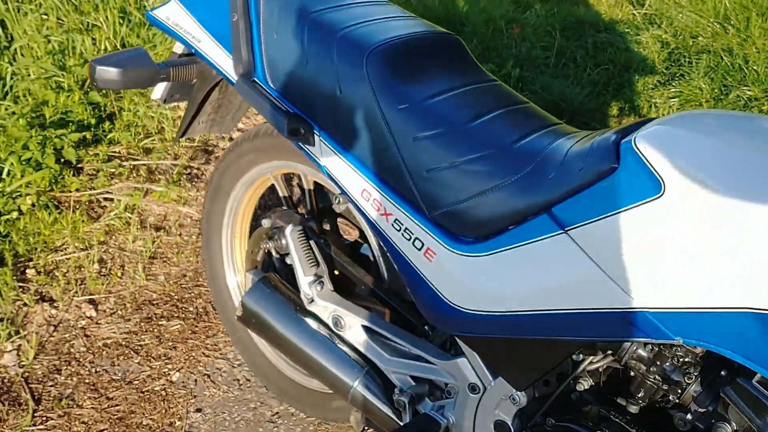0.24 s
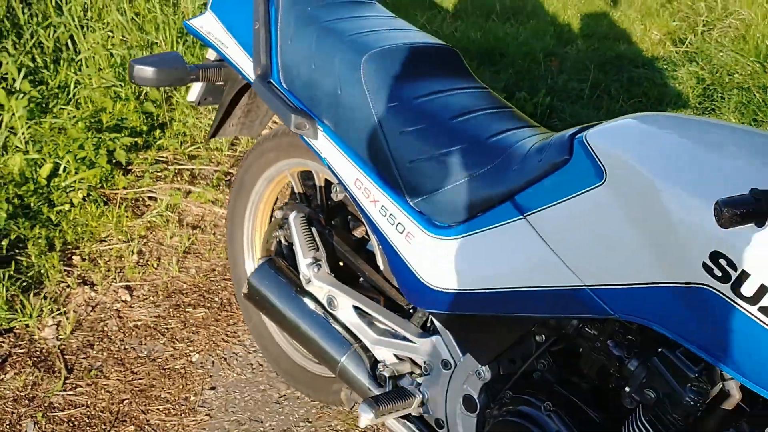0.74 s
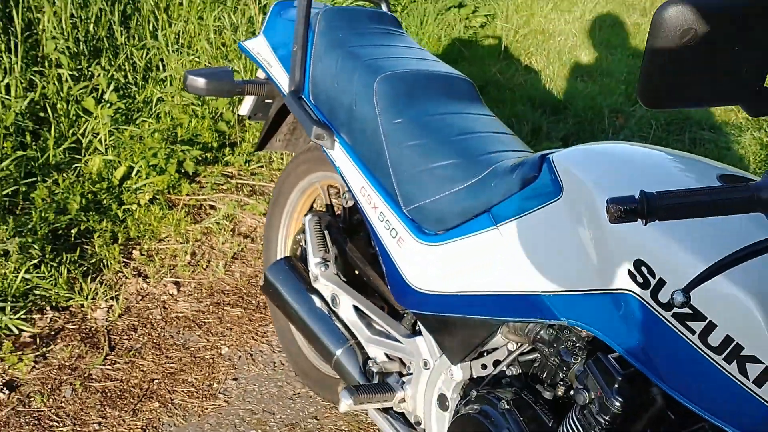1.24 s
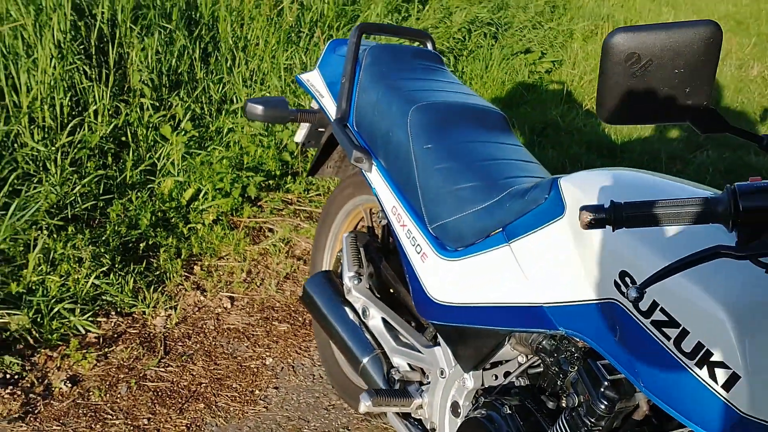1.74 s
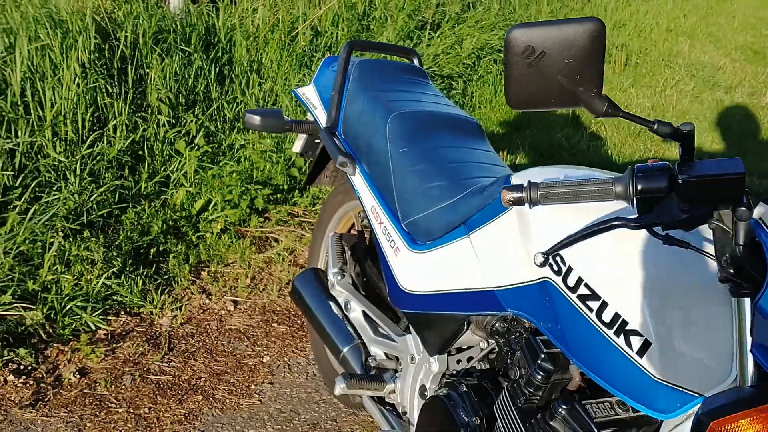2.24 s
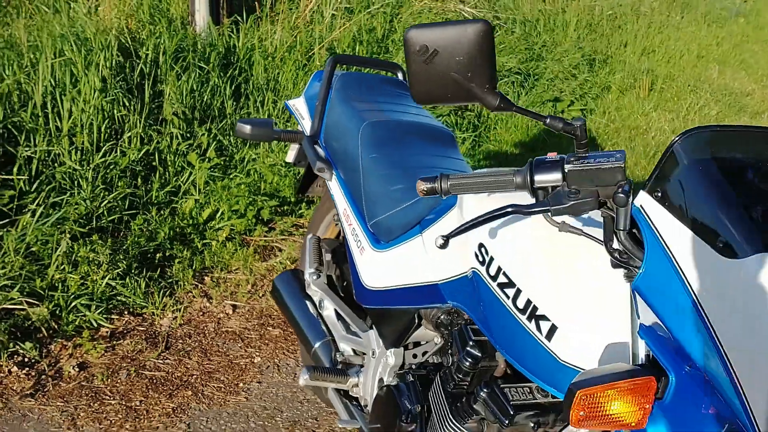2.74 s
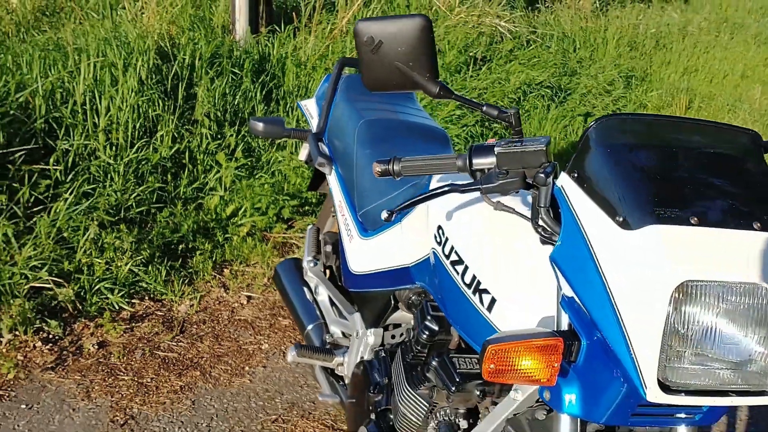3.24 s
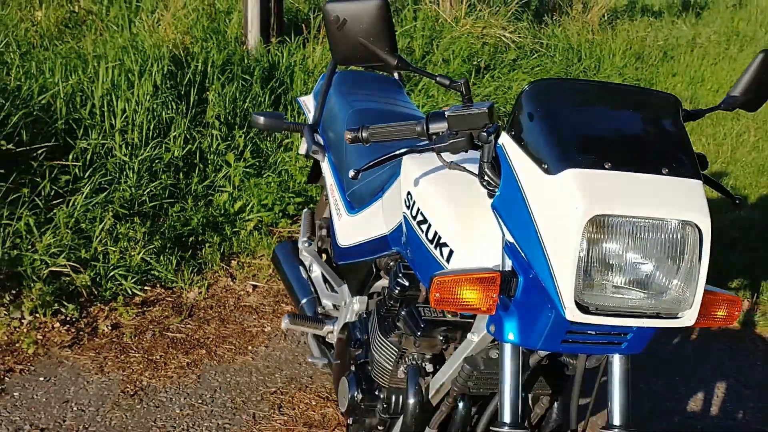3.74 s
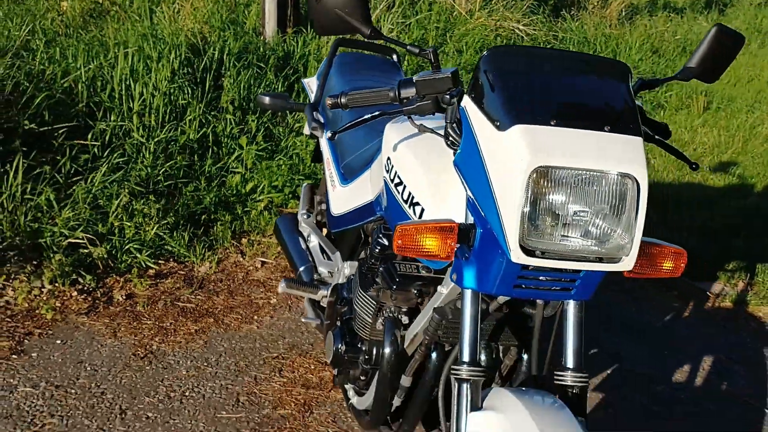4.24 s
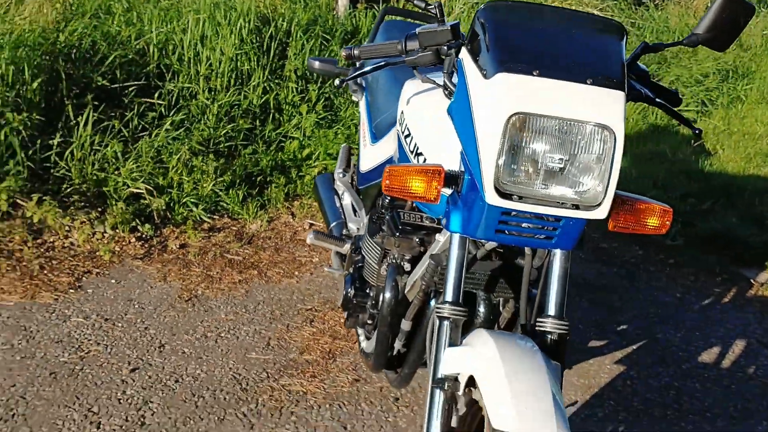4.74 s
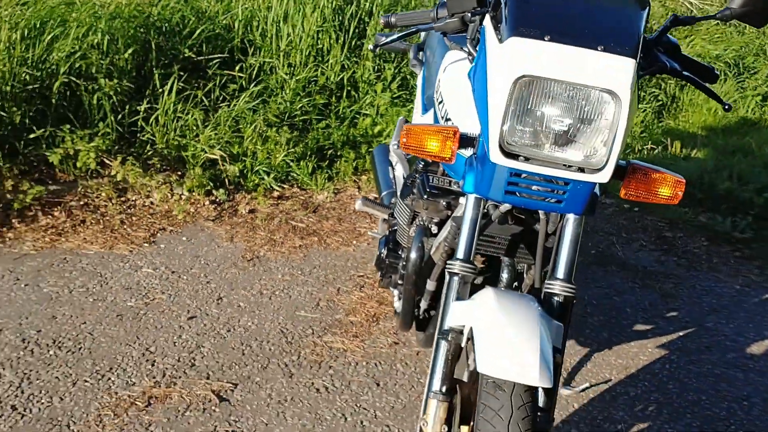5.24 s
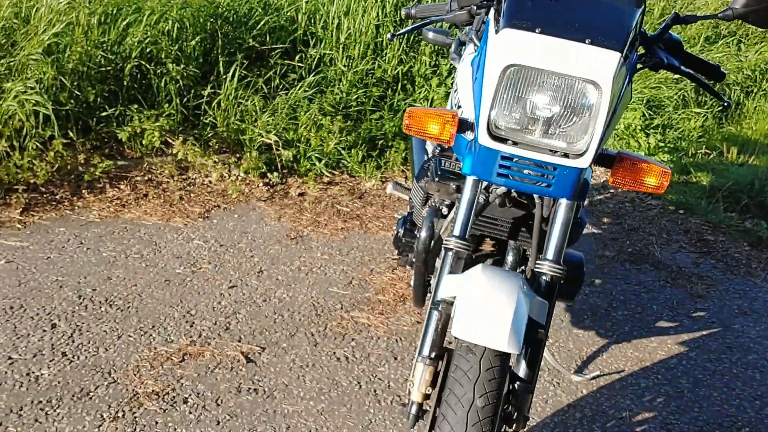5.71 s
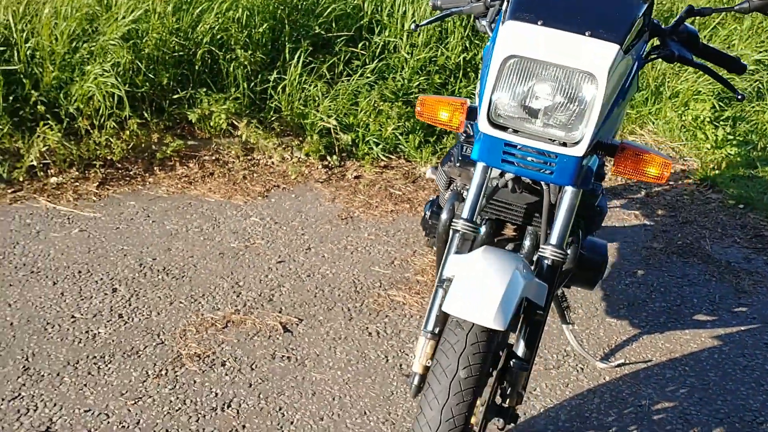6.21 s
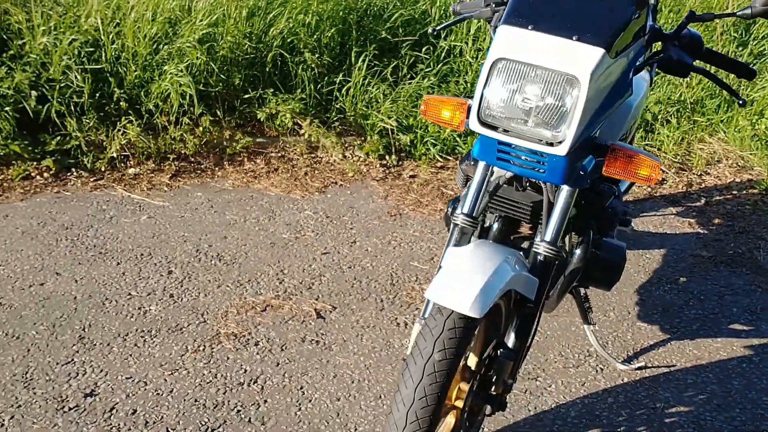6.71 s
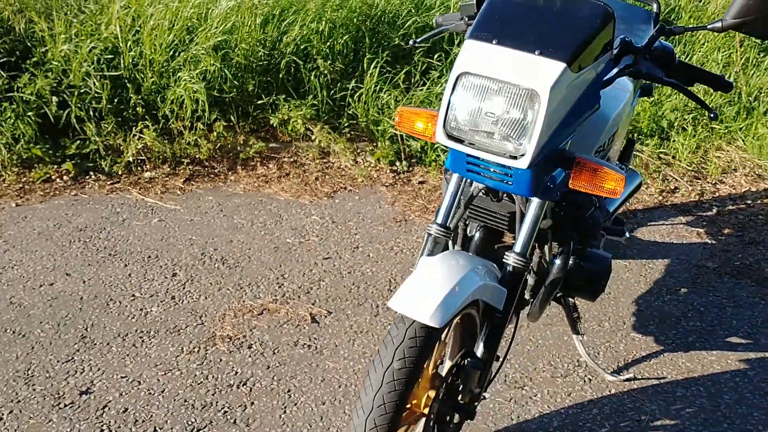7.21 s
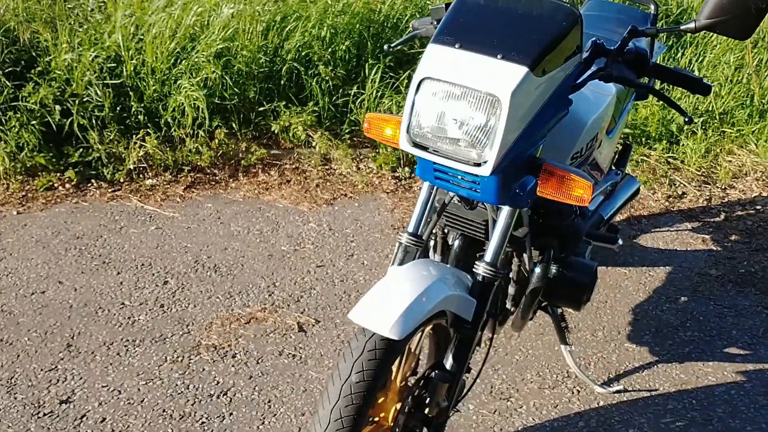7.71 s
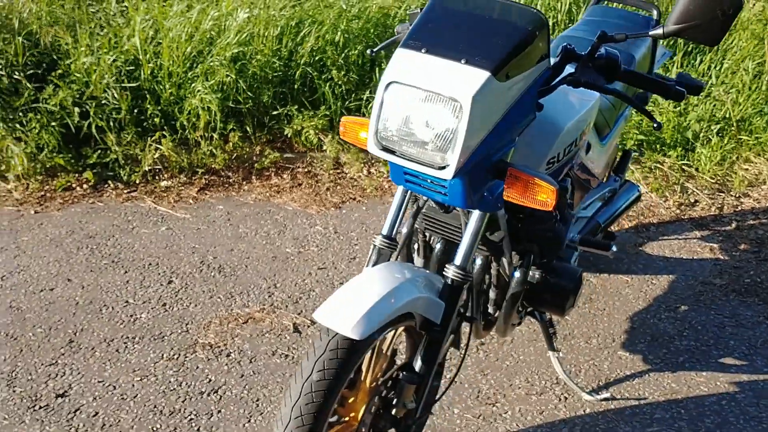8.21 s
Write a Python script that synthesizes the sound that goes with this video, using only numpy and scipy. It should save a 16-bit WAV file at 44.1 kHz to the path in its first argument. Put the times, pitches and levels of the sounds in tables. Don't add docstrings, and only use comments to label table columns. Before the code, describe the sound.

A hand-held stereo microphone begins about one metre from an idling motorcycle, catching fast exhaust pulses, a hollow silencer boom, clattering engine cases and airy hiss, buffeted by gusts. It walks round to the front and roughly three metres away, where the fairing softens the treble. Small stones crunch near four seconds, a fin sings thinly near five, and the uneven idle continues outdoors to the end.

```python
import sys
import numpy as np
from scipy import signal
from scipy.fft import rfft, irfft, next_fast_len
from scipy.io import wavfile
from scipy.ndimage import uniform_filter1d, map_coordinates

SR = 44100
rng = np.random.default_rng(int(sys.argv[2]) if len(sys.argv) > 2 else 0)


def linear_from_db(decibels):
    return 10 ** (np.asarray(decibels, float) / 20)


def file_out(sig):
    cols = np.atleast_2d(sig).T
    lim = np.clip(cols, -1, 1)
    pcm = np.round(lim * 32767).astype(np.int16)
    wavfile.write(sys.argv[1], SR, pcm)


N = 373086

FIRING_HZ = 47.2
# t/s, firings gained on a steady idle
CRANK_DRIFT = [(.141, -.005), (.705, -.84), (1.3, -1.23), (2.42, -1.33), (3, -.88), (3.8, -.66),
               (4.2, -.92), (4.5, -.87), (4.8, -1.13), (5.25, -.76), (5.5, -.73), (5.9, -.97), (6.5, -1.32),
               (6.8, -1.2), (7.3, -1.44), (7.72, -1.25), (8, -1.41), (8.46, -1.5)]
MISS_EVERY_FIRINGS, SLIP_S, SUCK_BACK_RATIO = 8, 5.75, -.58
# from t/s, to t/s, strength [1 = normal]
STUMBLE = (3.5, 5.2, .66)
# t/s, strength [1 = normal]
PART_BURNS = [(.17, 0.2), (.52, 0.44), (.696, 0.17), (.868, .56), (.975, -.12), (1.039, 0.042),
              (1.552, -0.16), (2.061, .46), (2.735, 0.44), (3.069, -0.12), (3.913, -0.15), (4.426, -0.099),
              (4.597, 0.55), (4.77, 0.68), (5.271, 0.75), (5.439, 0.39), (5.868, -0.039), (6.039, 0.046),
              (6.21, -0.24), (6.721, -.15), (6.869, -0.82), (6.955, 0.48), (7.233, 0.51), (7.403, -0.14),
              (7.739, 0.41), (7.91, 0.31), (8.081, .19), (8.251, 0.1)]
# delay [firings], sharpness, steady level/dB, level/dB of cylinders 1-4
SHELL_BEAT = (.1, .9, -11, -10, -4, 1.5, 0)
CASES_BEAT = (-.1, 2, 0, -6, 0, 0, -2)
FINS_BEAT = (-.15, 2, 0, -6, -2, -2, 0)
VALVES_BEAT = (-.15, 1.8, 0, -1, 0, -5, -2)
LEAK_BEAT = (-.2, 1.1, -7, 7, -2, -4, 0)

# f/Hz, width/Hz
PIPE = [
    (107, 20),
    (100, 55),
    (125, 190),
]
# f/Hz, width/Hz, level/dB
PIPE_UPPER = [(201, 14.7, -29.5), (283.3, 10, -37)]
# f/Hz, density [dB per Hz]
GAS_FLOW = [(120, -40), (170, -11), (300, -1), (350, -2.5), (420, -4.5), (600, -3.5), (700, -39),
            (900, -74)]
BOOM_DB_1M = -17.5
PUMP_HZ, PUMP_SHARE = 60, .4
# f/Hz, width/Hz
SHELL_MODES = [(475, 77), (548, 106), (672, 47)]
# level/dB at 1 m, lobe t/s, half width/s, lobe level/dB
SHELL_LOBES = [
    (-44, 2.55, .4, -6),
    (-48, 3.6, 2.2, 11.5),
    (-46, 3.2, 1.2, -9),
]

# level/dB at 1 m, fairing loss/dB
PARTS = [
    (-33, 5),
    (-36.5, 15),
    (-42, 14.5),
    (-39, 15.5),
]
# f/Hz, density [dB per Hz]
LOW_SIDE = [(350, -35), (600, -23), (687, 3.5), (754, -5.5), (875, -9.5), (948, -8.5), (1360, -10),
            (1540, -6), (1910, -7), (2090, -8.5), (2260, -8), (2540, -8.5), (3000, -40), (3900, -45),
            (6600, -120)]
LOW_FRONT = [(350, -36), (600, -12), (629, -42), (650, 4.5), (682, -4.5), (887, -10.5), (942, -7),
             (1020, -6.5), (1110, -7), (1260, -6), (1550, -5), (2540, -14), (3000, -3), (3900, -46),
             (6600, -120)]
HIGH_SIDE = [(1470, -35), (2500, 3.5), (3160, -8.5), (3490, -7.5), (3740, -2.5), (4110, -2.5), (5870, -10),
             (8200, -6.5), (9360, -8.5), (10200, -7), (11000, -16), (12300, -18), (13700, -22),
             (15200, -22.5), (16000, -39)]
HIGH_FRONT = [(1470, -39), (2500, -8), (2770, -6), (2940, -4.5), (3040, -5), (3130, -9.5), (3380, -13.5),
              (3740, -7), (4270, -9), (5740, -16), (8080, -12), (9360, -16.5), (12300, -11), (15200, -22.5),
              (16000, -17)]
# f/Hz, width/Hz, level/dB over the rustle
FIN_MODES = [(777, 30, -1), (952, 16, 2), (1150, 14, -1), (1432, 18, 0), (1528, 22, 0), (1913, 35, -3),
             (2228, 30, -1), (2323, 18, -1), (3342, 25, 1), (4066, 22, -2), (8016, 60, -2), (8790, 25, 2)]
# f/Hz, middle t/s, half width/s, level/dB
SINGING_FINS = [
    (2935, 5.25, .9, -58.5),
    (2935, 5.09, .03, -53),
    (2935, 5.26, .035, -52),
    (2935, 5.61, .04, -52),
    (2935, 5.92, .05, -56),
    (4000, 3.15, .12, -52),
    (8100, 3.5, .35, -58),
]
# f/Hz, left-right correlation [0-1]
ALIKE_SIDE = [(300, .93), (640, .95), (1400, .68), (3000, .55), (5500, .45), (7200, .6), (10000, .55),
              (13000, .87)]
ALIKE_FRONT = [(300, .96), (640, .96), (1400, .82), (3000, .62), (5500, .5), (7200, .68), (10000, .68),
               (13000, .9)]

# t/s, flank share in sight [0-1]
VIEW = [(0, 1), (2.9, 0.92), (3.7, 0.36), (4.5, 0), (8.46, 0.04)]
# t/s, distance/m, fairing shadow [0-1]
WALK = [(0, 1.09, 0.04), (.4, 0.95, 0.17), (1.1, 1.02, 0.14), (1.7, 1.14, 0.15), (2.4, 1.026, 0.22),
        (3.06, 1.24, 0.26), (3.4, 1.75, 0.57), (3.74, 2.35, 0.87), (4.3, 2.54, .88), (4.76, 2.8, 0.9),
        (5.1, 2.7, 0.96), (5.7, 3.32, 0.93), (6.4, 3.1, 0.98), (7.2, 3.2, 0.92), (7.9, 3.3, 0.78),
        (8.46, 3.3, 0.8)]
# t/s, share of pulsing surviving round the fairing [0-1]
LEAK_DIRECT = [(0, 0.83), (3.3, 0.9), (4.2, .95), (5.6, 1), (6.4, 0.7), (8.46, 0.5)]
# t/s, lag/samples
PORT_LAG = [(0, 5.5), (2, 5), (3.5, 1.5), (4.5, 0.5), (6.5, 3), (8.46, 1)]

# t/s, peak level/dB, left-right/dB
GRIT = [
    (3.935, -23, -9),
    (4.1414, -35, -1.0),
    (4.148, -23, 3),
    (4.257, -29, -1.0),
]
# f/Hz, density [dB per Hz]
BUFFET = [(20, -28), (54, -9), (86, 0), (150, -2), (215, -8), (310, -18), (410, -26), (1000, -70)]
# t/s, peak level/dB
GUSTS = [(.13, -34), (.295, -31), (.55, -26.5), (.765, -31.5), (.93, -43), (1.08, -34.5), (1.15, -34.5),
         (1.4, -38), (1.65, -33.5), (2.06, -51), (2.58, -53), (3.02, -46), (3.25, -59), (4.3, -50),
         (4.62, -56), (5.7, -46), (6.54, -58), (7.05, -48), (7.3, -43.5)]
GUST_DB_PER_S, CALM_DB = 194, -69.5


def unit(x):
    return x / np.sqrt(np.mean(x ** 2) + 1e-20)


def along(points, hz):
    f, v = np.transpose(points)
    return np.interp(np.log(hz + 1), np.log(f + 1), v)


def curves(rows):
    s, *cols = np.transpose(rows)
    return [np.interp(np.arange(N) / SR, s, c) for c in cols]


def wobble(knots_per_s):
    knots = rng.standard_normal(int(N * knots_per_s / SR) + 4)
    return map_coordinates(knots, [np.arange(N) * knots_per_s / SR])


def lobe(middle_s, half_width_s):
    return np.exp(-((np.arange(N) / SR - middle_s) / half_width_s) ** 2)


def filtered(x, response):
    m = next_fast_len(N + SR // 2)
    return irfft(rfft(x, m) * response(np.fft.rfftfreq(m, 1 / SR)), m)[..., :N]


def resonance(f, hz, width):
    return 1j * f * width / (hz * hz - f * f + 1j * f * width)


def chamber(f, hz, width):
    return hz * hz / (hz * hz - f * f + 1j * f * width)


def modes(table):
    return lambda f: sum((-1) ** k * linear_from_db(db) * resonance(f, hz, w) for k, (hz, w, db) in enumerate(table))


def walk():
    metres, shadow = curves(WALK)
    return -20 * np.log10(metres), shadow


def firings():
    return FIRING_HZ * np.arange(N) / SR + curves(CRANK_DRIFT)[0]


def beat(delay, sharp, steady_db, *cylinder_db, scatter_db=1.5):
    turn = firings() - delay
    index = np.round(turn).astype(int)
    chance = rng.standard_normal(N // 800)[index + 1]
    peak = linear_from_db(np.array(cylinder_db)[index % 4] + scatter_db * chance)
    burst = peak * np.exp(sharp * (np.cos(2 * np.pi * turn) - 1))
    lope_db = .45 * np.interp(turn, np.arange(4), cylinder_db, period=4)
    return np.hypot(linear_from_db(steady_db + lope_db), burst)


def rustle(envelope, response, alike):
    def mid_side(f):
        angle = np.arccos(np.clip(along(alike, f), -.99, .99)) / 2
        return response(f) * np.array([np.cos(angle), np.sin(angle)])

    mid, side = filtered(envelope * rng.standard_normal((2, N)), mid_side)
    return unit(np.array([mid + side, mid - side]))


def strengths(count, at, luck):
    size = np.array([1.2, 1.03, 1.03, .95])[count % 4] * linear_from_db(.6 * luck)
    place = (count + 4 * (at > SLIP_S * SR)) % MISS_EVERY_FIRINGS
    missed = place == 0
    size[missed] = SUCK_BACK_RATIO * linear_from_db(1.8 * luck[missed])
    from_s, to_s, weak = STUMBLE
    size[(place == 2) & (at > from_s * SR) & (at < to_s * SR)] = weak
    for s, strength in PART_BURNS:
        size[np.argmin(abs(at - s * SR))] = strength
    return size


def exhaust():
    turn = firings()
    count = np.arange(1, int(turn[-1]) + 1)
    luck = rng.standard_normal((len(count), 2))
    at = np.interp(count, turn, np.arange(N))
    size = strengths(count, at, luck[:, 0])
    start = np.round(at - .0133 * SR + .0002 * SR * luck[:, 1]).astype(int)
    pulses = np.bincount(start, size, N)[:N]
    pumped = np.bincount(start, PUMP_SHARE * (size.mean() - size), N)[:N]

    def pipe(f):
        tail, box, mouth = PIPE
        return resonance(f, *tail) * chamber(f, *box) * chamber(f, *mouth) + 2 * modes(PIPE_UPPER)(f)

    def deep_pipe(f):
        return pipe(f) / (1 + (f / PUMP_HZ) ** 8)

    boom = unit(filtered(pulses, pipe) + filtered(pumped, deep_pipe)) * linear_from_db([[-.3], [.3]])
    gas = rustle(beat(*CASES_BEAT), lambda f: linear_from_db(along(GAS_FLOW, f)), ALIKE_FRONT)
    return linear_from_db(BOOM_DB_1M + walk()[0]) * (boom + linear_from_db(-23.5) * gas)


def silencer():
    puffs = beat(*SHELL_BEAT, scatter_db=.7)
    out = np.zeros((2, N))
    for (near_db, s, half_s, lobe_db), (hz, width) in zip(SHELL_LOBES, SHELL_MODES):
        db = near_db + walk()[0] + lobe_db * lobe(s, half_s) + .8 * wobble(3)
        cycles = hz * np.arange(N) / SR + .25 * wobble(30)
        struck = unit(puffs * np.sin(2 * np.pi * cycles))
        shaken = rustle(puffs, lambda f: resonance(f, hz, width * 1.13) ** 2, ALIKE_FRONT)
        out += linear_from_db(db - .4) * (.85 * struck + .53 * shaken)
    return out


def seen(envelope, side, front):
    share = np.clip(curves(VIEW)[0], 0, 1)
    flank = np.sqrt(share) * rustle(envelope, side, ALIKE_SIDE)
    return flank + np.sqrt(1 - share) * rustle(envelope, front, ALIKE_FRONT)


def band(table, low_hz, high_hz):
    def response(f):
        ringing = 1 + sum(linear_from_db(db) * abs(resonance(f, hz, w)) ** 2 for hz, w, db in FIN_MODES)
        edges = np.sqrt((1 + (low_hz / (f + 1)) ** 24) * (1 + (f / high_hz) ** 24))
        return linear_from_db(along(table, f)) * ringing / edges

    return response


def high_bands(low_hz, high_hz):
    return band(HIGH_SIDE, low_hz, high_hz), band(HIGH_FRONT, low_hz, high_hz)


def engine():
    near_db, shadow = walk()
    cases_db, fins_db, valves_db, leak_db = [db + near_db - lost_db * shadow for db, lost_db in PARTS]
    cases = seen(beat(*CASES_BEAT), band(LOW_SIDE, 797, 2350), band(LOW_FRONT, 665, 2620))
    fins = linear_from_db([[.5], [-.5]]) * seen(beat(*FINS_BEAT), *high_bands(2820, 5390))
    body = linear_from_db(cases_db + 2.22) * cases + linear_from_db(fins_db + 3.5) * fins
    valves = linear_from_db([[.6], [-.6]]) * seen(beat(*VALVES_BEAT), *high_bands(5670, 10860))
    leak_pulse = beat(*LEAK_BEAT, scatter_db=2.8) ** curves(LEAK_DIRECT)[0]
    leak = linear_from_db([[-.5], [.5]]) * seen(leak_pulse, *high_bands(12100, 20000))
    hiss = linear_from_db(valves_db + 2.5) * valves + linear_from_db(leak_db - 0.4) * leak
    return drifting(body, patchy_db=1.4) + singing(), drifting(hiss, patchy_db=1.6)


def singing():
    out = np.zeros((2, N))
    for hz in sorted({row[0] for row in SINGING_FINS}):
        tone = np.sin(2 * np.pi * (hz * np.arange(N) / SR + .3 * wobble(hz / 75)))
        shaken = rustle(1, lambda f: resonance(f, hz, hz / 45) ** 2, [(3000, .6)])
        power = sum((linear_from_db(db) * lobe(s, w)) ** 2 for fin_hz, s, w, db in SINGING_FINS if fin_hz == hz)
        out += np.sqrt(power) * (tone + .5 * shaken)
    return out


def drifting(x, patchy_db):
    z = signal.stft(x, nperseg=512)[2]
    field = uniform_filter1d(rng.standard_normal(z.shape[1:]), size=3, axis=0)
    for frames in (40, 20):
        field = uniform_filter1d(field, size=frames, axis=1)
    patches = linear_from_db(patchy_db * unit(field) - 0.03 * patchy_db ** 2)
    return signal.istft(z * patches, nperseg=512)[1][:, :N]


def grit():
    cracks = np.zeros((2, N))
    for s, db, pan_db in GRIT:
        cracks[:, round(s * SR)] = linear_from_db(db + 7 + np.array([pan_db, -pan_db]) / 2)

    def click(f):
        echo = 0.9 * np.exp(-2j * np.pi * f * .0009)
        return resonance(f, 14000, 11000) ** 2 * (1 + echo)

    return filtered(cracks, click)


def wind():
    t = np.arange(N) / SR
    gust = linear_from_db(CALM_DB) + sum(linear_from_db(db - GUST_DB_PER_S * abs(t - s)) for s, db in GUSTS)
    lumps = linear_from_db(2 * np.array([wobble(25), wobble(25)]))
    eddies = rustle(1, lambda f: linear_from_db(along(BUFFET, f)), [(100, .1)])
    return gust * linear_from_db([[7], [9]]) * unit(lumps * eddies)


def scene():
    body, hiss = engine()
    left, right = exhaust() + silencer() + body
    half_lag = curves(PORT_LAG)[0] * .5
    left = map_coordinates(left, [np.arange(N) - half_lag], order=3)
    right = map_coordinates(right, [np.arange(N) + half_lag], order=3)
    return np.array([left, right]) + hiss * linear_from_db([[-.4], [.4]]) + wind() + grit()


def band_limit(x):
    return signal.sosfilt(signal.butter(12, 16930, fs=SR, output="sos"), x)


def record(dry):
    def colour(f):
        return (1j * f / (19 + 1j * f)) ** 2 * (f < 15900)

    return band_limit(filtered(dry, colour))


dry = scene()
out = record(dry)
file_out(out)
```